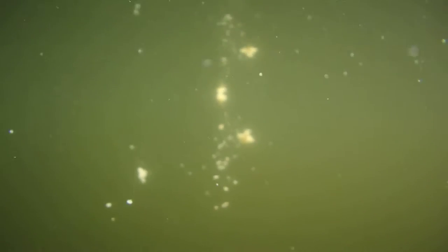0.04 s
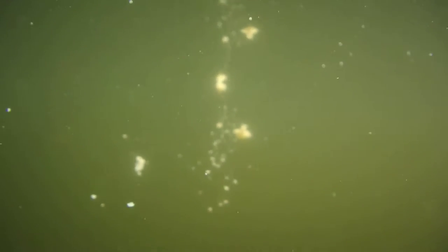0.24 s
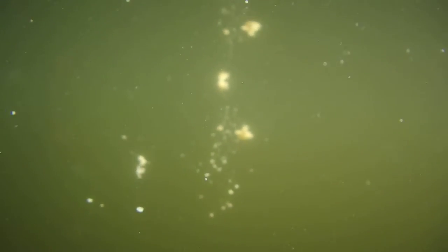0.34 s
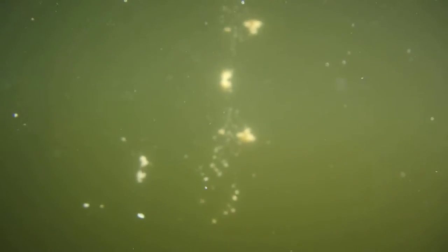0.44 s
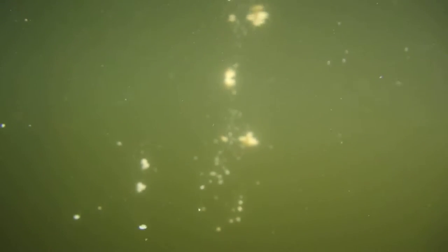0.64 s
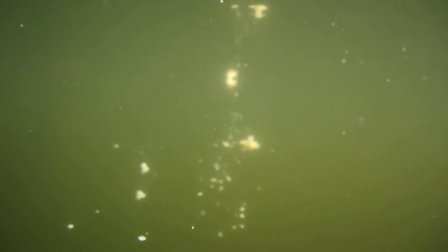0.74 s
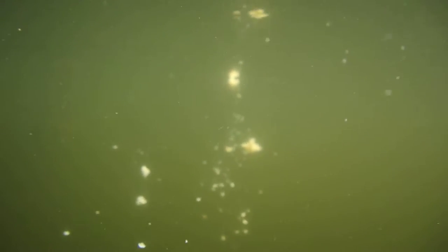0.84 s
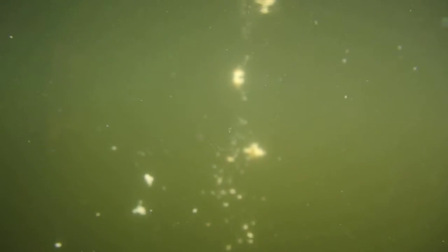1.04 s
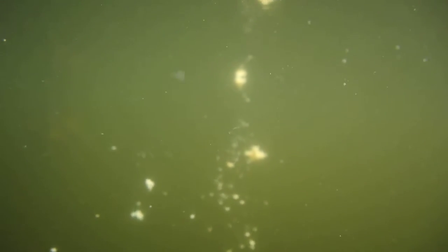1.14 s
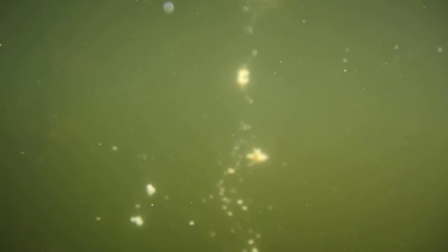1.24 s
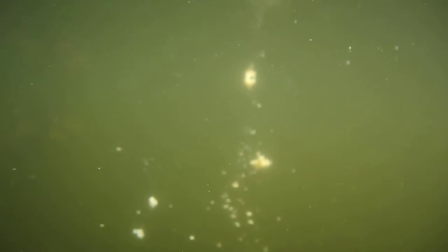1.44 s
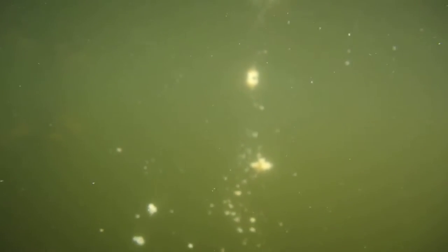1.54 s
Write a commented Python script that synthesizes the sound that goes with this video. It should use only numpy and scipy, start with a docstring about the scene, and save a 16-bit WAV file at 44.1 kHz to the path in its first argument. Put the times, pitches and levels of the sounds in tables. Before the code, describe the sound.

Two sharp, hollow knocks on a submerged camera case, followed by faint bubbling.

```python
"""Knocks on a camera under a pond

A camera in a waterproof housing is held under the surface, its two microphones inside the case.
Right at the microphones a hand rubs the case and knocks it twice. The first knock overloads the
recorder, whose limiter ducks the hollow hiss of the housing and lets it creep back.
A few faint bubble ticks and a soft low gurgle follow in the water close by."""
import sys
import numpy as np
from scipy import signal
from scipy.fft import rfft, irfft
from scipy.io import wavfile

SR = 44100
rng = np.random.default_rng(int(sys.argv[2]) if len(sys.argv) > 2 else 0)


def wrap_up_sound(samples):
    """Save the sound to the file named by the first command line argument, as 16-bit audio."""
    columns = np.atleast_2d(samples).T
    # keep every value between -1 and 1, then stretch to whole-number steps
    tamed = np.clip(columns, -1, 1)
    steps = np.round(tamed * 32767).astype(np.int16)
    wavfile.write(sys.argv[1], SR, steps)


N = 70560
T, HZ = np.arange(N) / SR, np.fft.rfftfreq(N, 1 / SR)

# hiss inside the housing (frequency [Hz], relative centre level [dB], relative side level [dB])
HISS_SPECTRUM = [(30, -30, -44), (85, -15, -25), (150, -7.5, -11.5), (222.2, -1.5, -9.5), (403, -6, -15.5),
                 (480, -13, -13.5), (620, -24.5, -22.5), (818, -22, -24), (833, -10.5, -12.5),
                 (1134, -19, -16), (1350, -19.5, -24), (1340, -25, -27.5), (1624, -14, -15),
                 (2040, -17, -17), (2250, -23, -22.5), (2887, -40, -38), (3060, -22.5, -26.5),
                 (4400, -39, -43), (7400, -45.5, -46.5), (8500, -29.5, -38.5), (8330, -19.5, -31.5),
                 (8700, -42, -39.5), (10600, -28, -38), (11000, -39.5, -44.5), (14300, -37, -40.5),
                 (15800, -53, -56)]
# narrow bands in the hiss: resonances that make it hollow, and a faint whine near 1 kHz (frequency [Hz], half-
# width [Hz], level [dB])
HISS_BANDS = [(210, 26, -44.5), (258.2, 13, -42), (369.6, 10, -41.5), (1020, 46, -49.5), (1640, 130, -51)]
# water rumbling as it settles (time [s], level [dB], rise time [s])
SLOSH_EVENTS = [(0.65, -14.5, 0.016), (1.446, -30, 0.035)]
# colour of that rumble (frequency [Hz], relative level [dB])
SLOSH_SPECTRUM = [(25, -32), (60, -10), (110, 1), (200, -3), (300, -10), (600, -28), (2000, -68)]
# water gulping at the case (time [s], level [dB], pitch [Hz], rise time [s])
GULP_EVENTS = [(0.776, -20.5, 245, 0.0063), (1.027, -23.5, 306, 0.0019), (1.4216, -13.5, 278, 0.0044),
               (1.432, -20.5, 291.6, 0.0064), (1.439, -6.5, 142, 0.0051), (1.459, -14.5, 124, 0.0062),
               (1.498, -24, 176, 0.0098)]
# small bubbles (time [s], level [dB], pitch [Hz], rise time [s])
BUBBLE_EVENTS = [(0.861, -38, 1692, .001), (1.0169, -22, 1798, 0.0019), (1.029, -22.5, 1245, 0.00094),
                 (1.052, -21.5, 1820, 0.0011), (1.185, -21, 1800, 0.0019), (1.249, -36, 1930, .001)]
# hand rubbing the case (frequency [Hz], relative level [dB])
RUB_SPECTRUM = [(25, 3.5), (80, -6), (150, -5.5), (270, 0.5), (430, -1.5), (620, -7), (1000, -22.5),
                (1300, -20.5), (1650, -6.5), (2300, -23), (5000, -49), (12000, -44.5)]
# modes of the case (frequency [Hz], relative left level [dB], relative right level [dB], t60 [s])
CASE_MODES = [(120, -30.5, -26, .07), (170, -13, -0.5, .03), (241, 4, -1, 0.026), (340, -19, -15.5, .055),
              (415, -2.5, -14.5, 0.036), (660, -4, 4.5, 0.013), (854, -3.5, -3.5, 0.013),
              (1130, -0.5, 0, .009), (1600, -4.5, -8.5, .008), (2550, -23.5, -19.5, .006),
              (3172, -18, -16, .02)]
# gritty edge of a contact (frequency [Hz], relative level [dB])
GRIT_SPECTRUM = [(1000, 12.5), (4400, -0.5), (5500, -7), (7500, -6), (11000, 1), (16000, -1)]
# light touches and two hard double contacts on the case
# (time [s], level before the limiter [dB], contact time [s], left lag [s], relative grit level [dB])
CONTACTS = [(0.0485, -24.5, 0.00066, 0.00012, -39.5), (0.1923, -14.5, .0005, 0.00084, -33),
            (0.2066, 0.5, 0.00061, 0.00063, -28), (0.2105, 33.5, 0.00023, 0.00061, -22.5),
            (0.6478, 14.5, 0.00014, 0.0011, -34), (0.6506, 35, 0.00014, 0.000444, -30.5)]
# narrow dips in the recorder's response (frequency [Hz], width [Hz])
RECORDER_NOTCHES = [(2048, 120), (3020, 220), (4096, 120), (5200, 350), (6144, 140)]


def amp(db):
    """Decibels to gain."""
    return 10 ** (np.asarray(db) / 20)


def unit(x):
    """Scales to rms 1."""
    return x / np.sqrt(np.mean(x ** 2) + 1e-20)


def filtered_noise(gain):
    """Noise of rms 1, shaped by a gain at each frequency."""
    return unit(irfft(rfft(rng.standard_normal(N)) * gain, N))


def noise(hz, db):
    """Noise of rms 1 whose spectrum follows the given points."""
    return filtered_noise(amp(np.interp(np.log(HZ + 1), np.log(hz), db)))


def delay(x, seconds):
    """Delays a sound, by fractions of a sample too."""
    return irfft(rfft(x) * np.exp(-2j * np.pi * HZ * seconds), N)


def swell(start, rise_s):
    """Rises to 1 in rise_s, then dies away."""
    u = np.maximum(T - start, 0) / rise_s
    return u * np.exp(1 - u)


def air_pocket(start, db, hz, rise_s):
    """A few cycles of a pocket of air pulsing under water."""
    return amp(db) * swell(start, rise_s) ** 2 * np.sin(2 * np.pi * hz * (T - start))


def housing_hiss():
    """Steady stereo noise, coloured by the air around the microphones."""
    hz, centre_db, side_db = np.transpose(HISS_SPECTRUM)
    centre = amp(-36) * noise(hz, centre_db)
    side = amp(-39.5) * noise(hz, side_db)
    return np.array([centre + side, centre - side])


def narrow_bands():
    """Narrow bands stand out of the hiss: most make it sound hollow, and one near 1 kHz is a faint steady
    whine."""
    return sum(amp(db) * filtered_noise(1 / (1 + ((HZ - hz) / half_width) ** 2))
               for hz, half_width, db in HISS_BANDS)


def slosh():
    """Disturbed water rumbles briefly against the case."""
    envelope = sum(amp(db) * swell(start, rise_s) for start, db, rise_s in SLOSH_EVENTS)
    return envelope * noise(*np.transpose(SLOSH_SPECTRUM))


def gulps():
    """Pockets of air pulse at the case in a soft, low gurgle."""
    return sum(air_pocket(*gulp) for gulp in GULP_EVENTS)


def bubble_ticks(snap_db=-17.5, snap_rise_s=0.00077):
    """Tiny bubbles each start with a soft snap and ring briefly."""
    snap = noise(hz=[1000, 1917.5, 3835, 6000], db=[-30, -3, -2, -30])
    return sum(air_pocket(start, db, hz, rise_s) + amp(db + snap_db) * swell(start, snap_rise_s) * snap
               for start, db, hz, rise_s in BUBBLE_EVENTS)


def hand_rub(level_db=-35, flutter_db=4.5, end_s=0.21, release_s=0.013):
    """A hand scuffs the case, low and uneven, and stops at the first hard knock."""
    flutter = filtered_noise(HZ < 60)
    scuff = unit(noise(*np.transpose(RUB_SPECTRUM)) * amp(flutter_db * flutter))
    fade = np.clip(1 - (T - end_s) / release_s, 0, 1)
    rub = amp(level_db) * scuff * fade
    return np.array([delay(rub, seconds=0.0005), rub])


def case_knocks(grit_delay_s=0.0008, grit_half_length_s=0.0008):
    """Each contact cracks and rings the damped modes of the case; longer contacts are duller."""
    t, out = T[:8192], np.zeros((2, N))
    displacement = sum(amp(np.array([[left], [right]]) - 60 * t / t60) * np.sin(2 * np.pi * hz * t) / hz
                       for hz, left, right, t60 in CASE_MODES)
    ring = np.diff(displacement, axis=1)
    grit = np.array([noise(*np.transpose(GRIT_SPECTRUM)) for side in range(2)])
    for start, db, contact_s, lag_s, grit_db in CONTACTS:
        force = swell(start, contact_s)
        blow = signal.fftconvolve(force[None], ring, axes=1)[:, :N]
        burst = np.exp(-((T - start - grit_delay_s) / grit_half_length_s) ** 2)
        left, right = blow / abs(blow).max() + amp(grit_db) * burst * grit
        out -= amp(db) * np.array([delay(left, lag_s), right])
    return out


def scene():
    """Everything that reaches the two microphones; the water sounds sit in the centre."""
    housing = case_knocks() + hand_rub() + housing_hiss() + narrow_bands()
    return housing + bubble_ticks() + gulps() + slosh()


def limiter(x, ceiling_db=0.5, attack_s=0.00022, recover_s=2.85, lookahead_s=0.00067):
    """A peak over the ceiling ducks both channels at once; the gain then creeps back."""
    over_db = np.maximum(20 * np.log10(abs(x).max(0) + 1e-9) - ceiling_db, 0)
    recovery = np.exp(-T / recover_s)
    held_db = np.maximum.accumulate(over_db / recovery) * recovery
    early_db = np.interp(T + lookahead_s, T, held_db)
    pole = np.exp(-1 / (attack_s * SR))
    duck_db = signal.lfilter([1 - pole], [1, -pole], early_db)
    return x * amp(-duck_db)


def record(dry, low_cut_hz=25, band_limit_hz=16300):
    """The camera's recorder: limiter, soft overload, low cut, narrow notches and band limit."""
    x = limiter(dry)
    x = x / (1 + x ** 6) ** (1 / 6)  # rounds off peaks that get past the limiter
    x = signal.lfilter(*signal.butter(1, low_cut_hz, "high", fs=SR), x)
    for hz, width in RECORDER_NOTCHES:
        x = signal.lfilter(*signal.iirnotch(hz, hz / width, SR), x)
    low_pass = signal.firwin(301, band_limit_hz, window=("kaiser", 9), fs=SR)
    return signal.oaconvolve(x, low_pass[None], "same")


dry = scene()
out = record(dry)
wrap_up_sound(out)
```